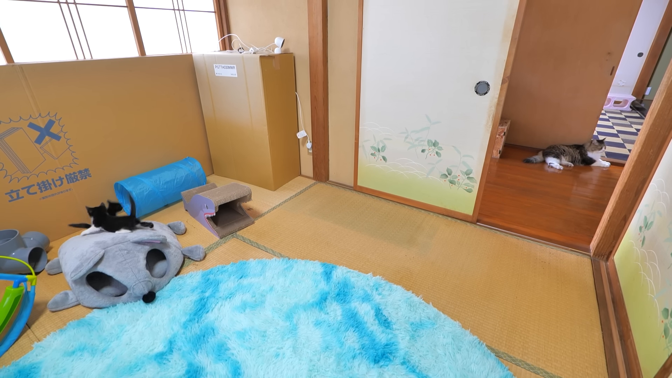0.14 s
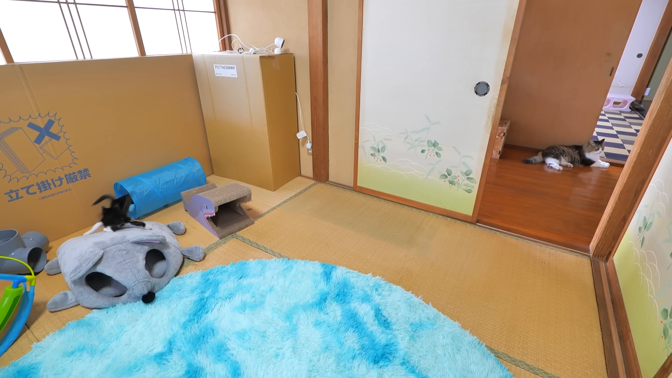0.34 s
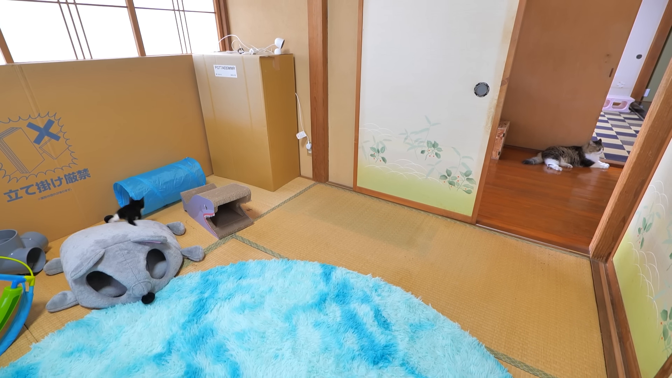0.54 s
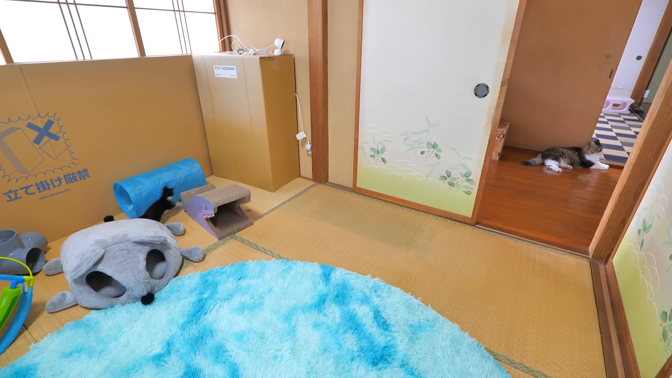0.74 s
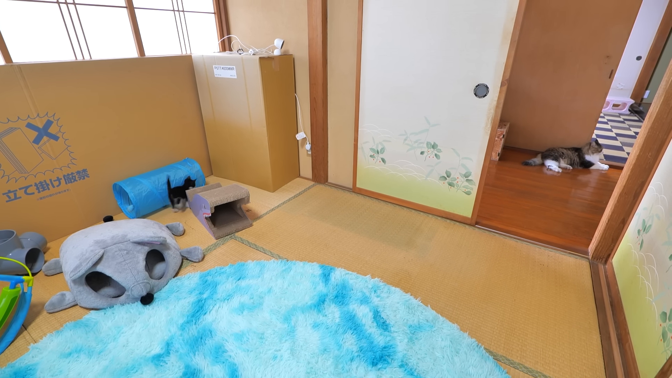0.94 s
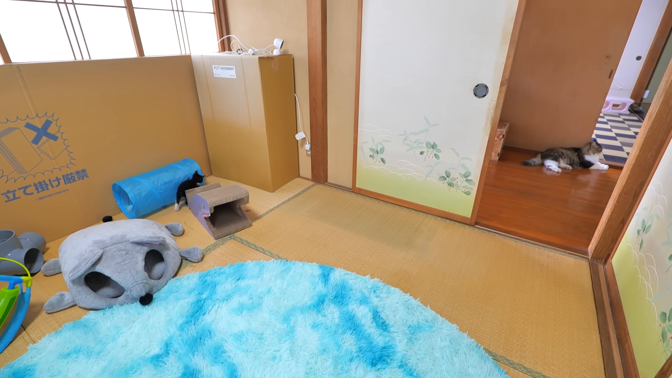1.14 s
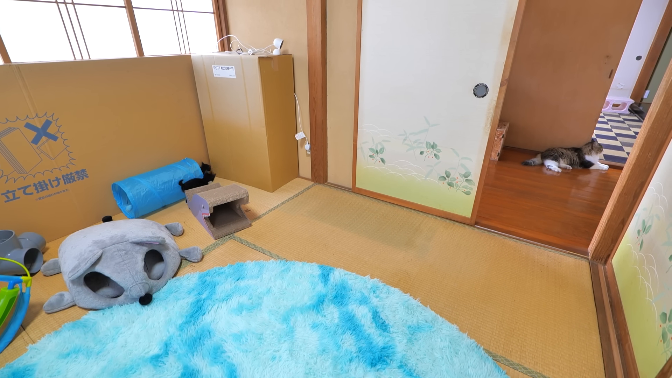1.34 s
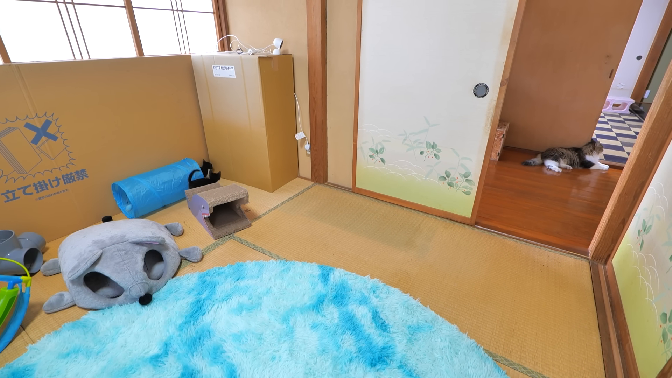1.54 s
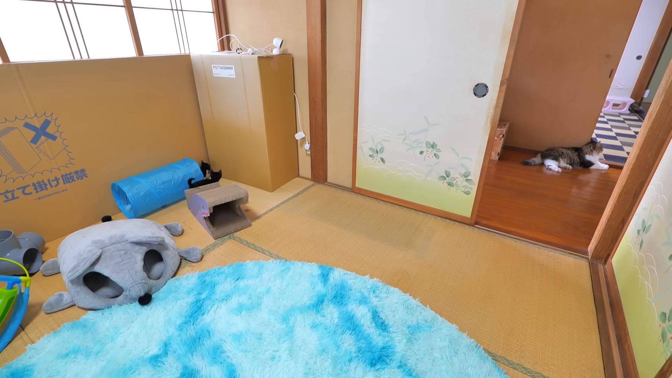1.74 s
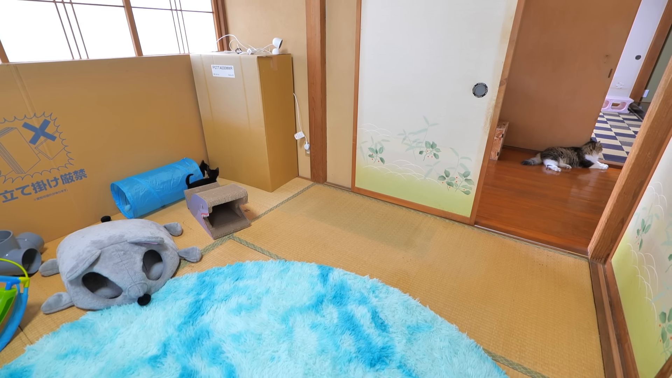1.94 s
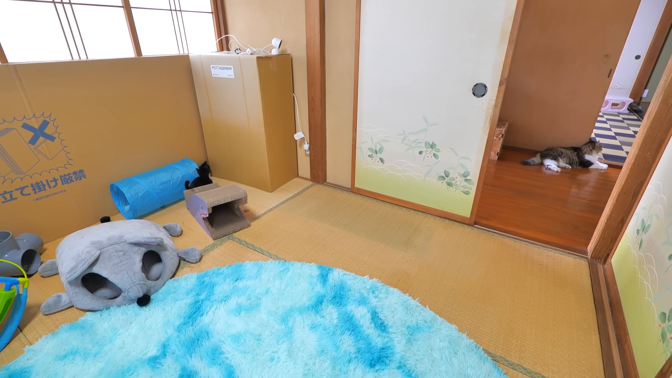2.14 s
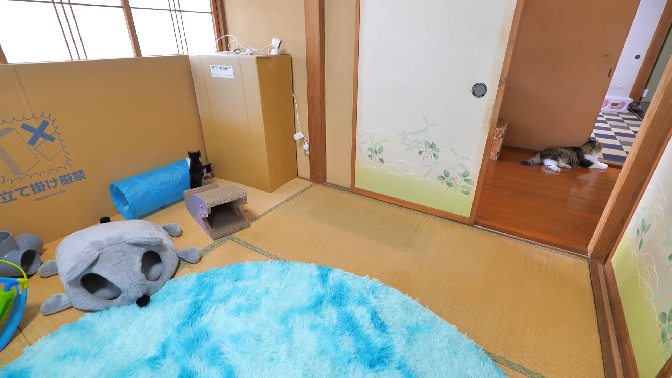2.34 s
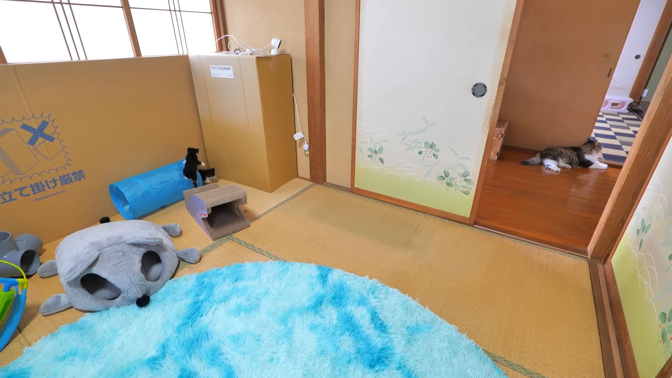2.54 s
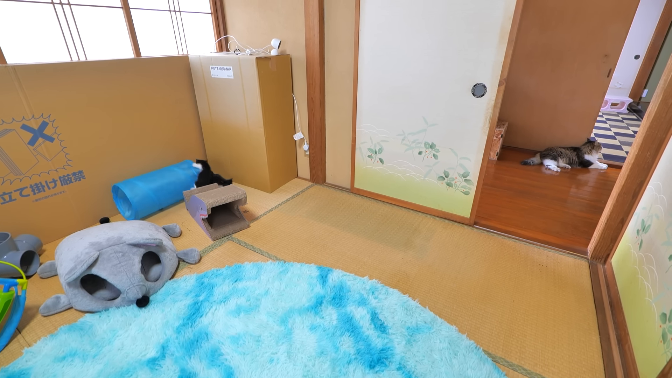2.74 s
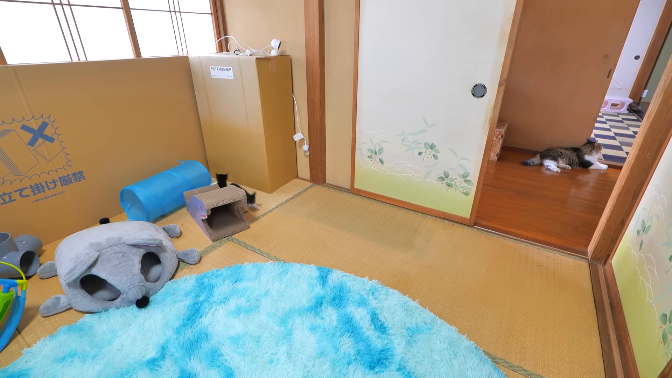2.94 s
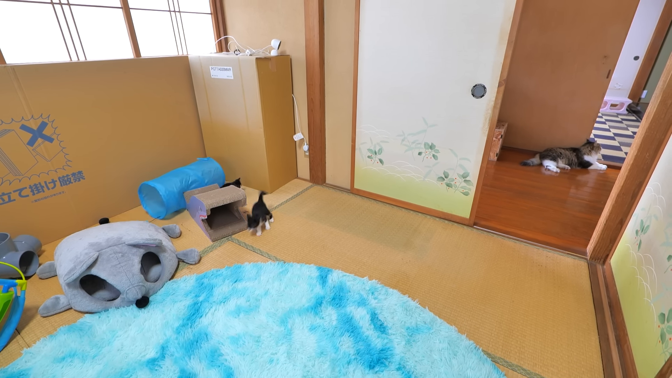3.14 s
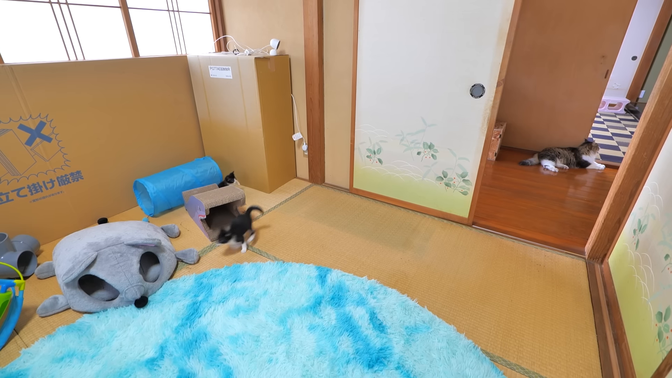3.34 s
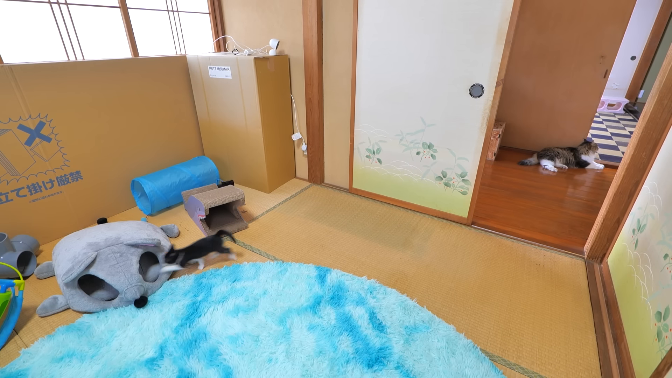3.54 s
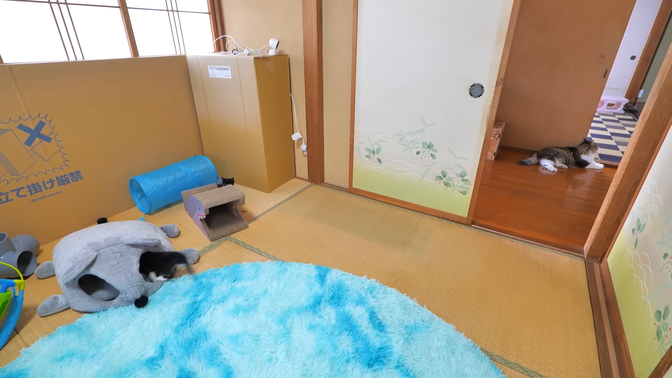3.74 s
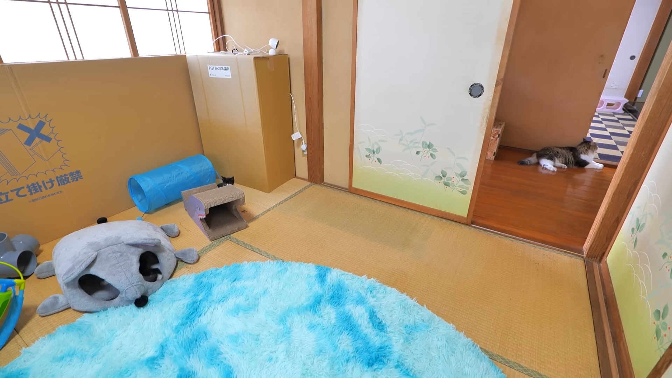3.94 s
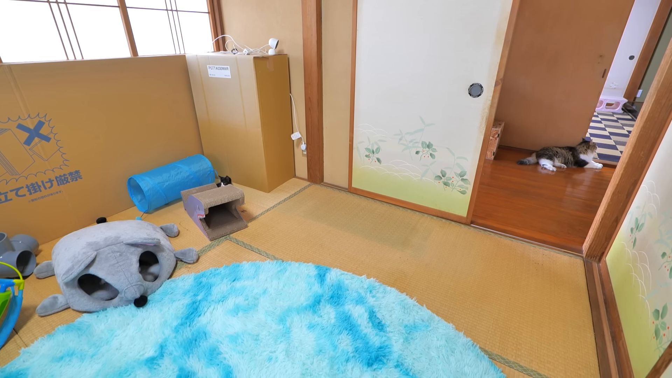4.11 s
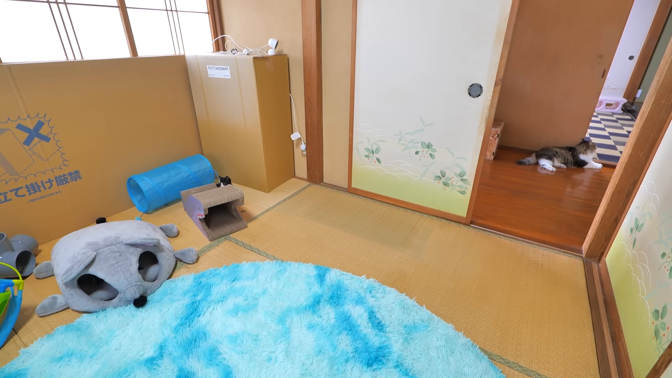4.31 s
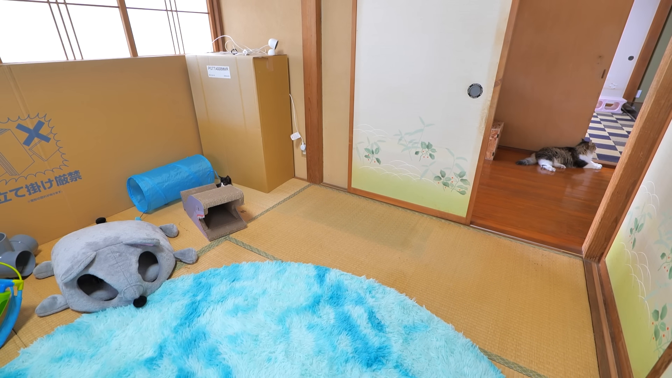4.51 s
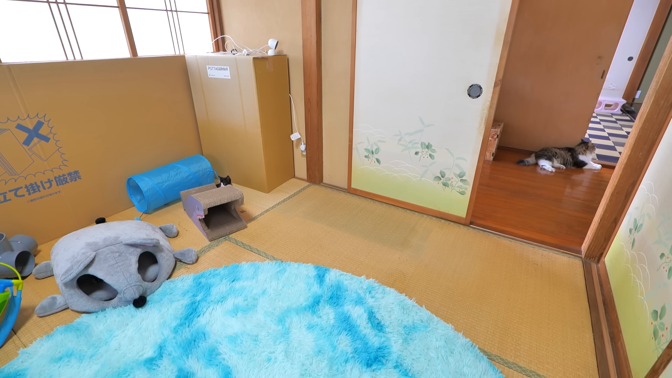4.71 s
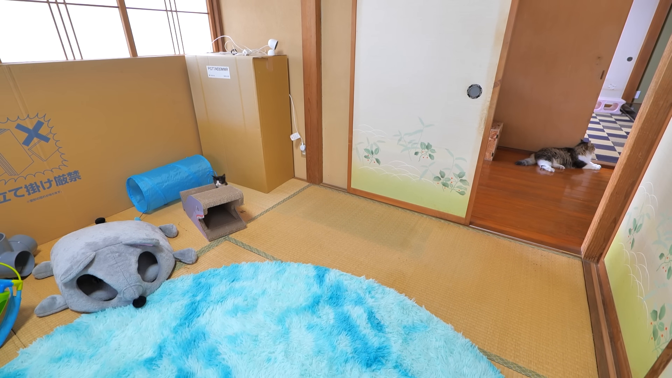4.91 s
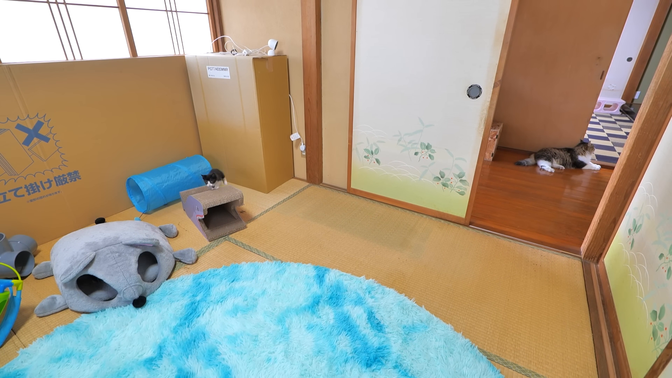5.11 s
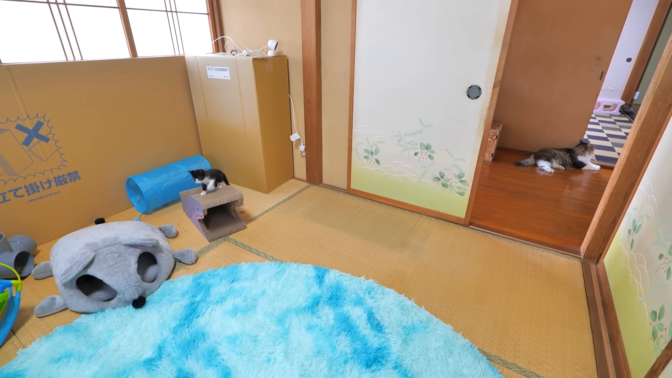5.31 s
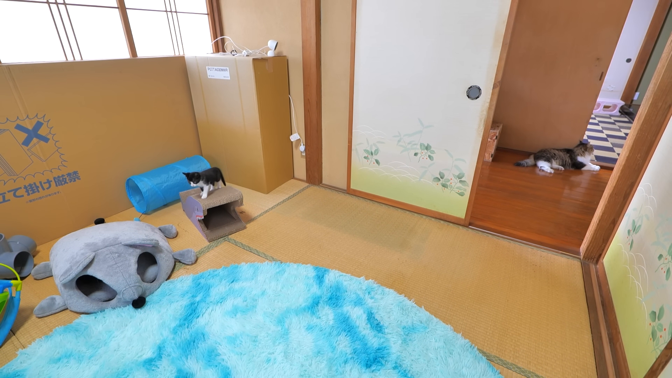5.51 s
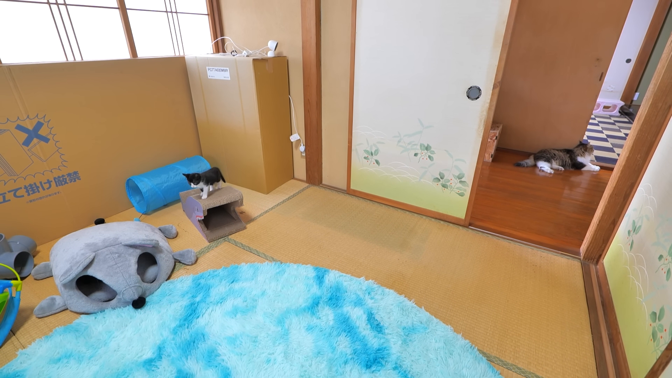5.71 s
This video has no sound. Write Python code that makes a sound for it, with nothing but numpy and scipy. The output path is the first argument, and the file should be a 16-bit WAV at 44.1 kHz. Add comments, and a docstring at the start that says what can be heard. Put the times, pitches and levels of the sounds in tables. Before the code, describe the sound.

Kittens romp a few metres from a mono camera microphone in a small room. Thumps and claw ticks build to a heavy tumble just before one second, ease to scattered taps, then return as a dense scramble with crinkling film around two and a half to three and a half seconds. After four seconds only faint hum, hiss and a few tiny taps remain.

```python
"""Kittens romping indoors

Kittens play over a plush bed, a crinkly tunnel and a cardboard box on a straw-mat floor, a few metres from
a mono camera microphone. Blows mix a short knock, box modes rung by noise, a slower floor thud and a scuff.
Claw ticks are short noise bursts; cloth and film rustle as grainy noise. A small room answers with decaying noise.
Under it lie a wavering hum, murmur and hiss of shaped noise, and one faint throbbing trill from outdoors."""
import sys
import numpy as np
from scipy import signal
from scipy.fft import rfft, irfft
from scipy.io import wavfile
from scipy.ndimage import uniform_filter1d

SR = 44100
rng = np.random.default_rng(int(sys.argv[2]) if len(sys.argv) > 2 else 0)


def waveform_to_disk(signal):
    """Save audio, clipped to [-1, 1], as 16-bit WAV at the path in sys.argv[1]."""
    frames = np.transpose(np.atleast_2d(signal))
    scaled = np.clip(frames, -1, 1) * 32767
    samples = np.round(scaled).astype(np.int16)
    wavfile.write(sys.argv[1], SR, samples)


N = 254016  # samples


def undb(db):
    """Turn dB into an amplitude gain."""
    return 10 ** (np.asarray(db) / 20)


def level(x, db):
    """Scale to an rms level in dB."""
    return x * undb(db) / np.sqrt(np.mean(x ** 2))


def band(x, hz, width, order=1):
    """Band-pass with hz as the geometric centre and width in Hz, kept below 0.45 of the sample rate."""
    low = np.sqrt(hz ** 2 + width ** 2 / 4) - width / 2
    high = min(low + width, .45 * SR)
    return signal.sosfilt(signal.butter(order, [low, high], "band", fs=SR, output="sos"), x)


def walk(rate):
    """Random levels held for 1 / rate seconds, then smoothed twice over that time."""
    hold = int(SR / rate)
    steps = np.repeat(rng.standard_normal(N // hold + 1), hold)
    return uniform_filter1d(uniform_filter1d(steps, hold), hold)[:N]


def add(out, s, x):
    """Mix x into out from time s."""
    start = int(s * SR)
    out[start:start + len(x)] += x[:N - start]


def grains(noise, chance, per_s, spread_db):
    """Noise whose level jumps in small random grains, per_s of them a second."""
    size = int(SR / per_s)
    steps_db = spread_db * np.repeat(chance, size)[:len(noise)]
    return noise * uniform_filter1d(undb(steps_db), size // 2 + 1)


def attack(t, rise_s):
    """Exponential approach to full level."""
    return 1 - np.exp(-t / rise_s)


# colour of the room murmur and microphone hiss: f/Hz, relative level/dB
MURMUR = [(15, -57), (25, -3.5), (102, -4.5), (161, -8), (249, -7.5), (363, -12.5), (416, -24),
          (476, -15.5), (641, -17), (1790, -21), (3720, -34.5), (14800, -31.5), (16000, -34)]
# narrow murmur band: f/Hz, width/Hz, level/dB rms
MURMUR_BAND = [(424, 20, -71)]
MURMUR_DB = -63  # rms before the swell


def background():
    """Room murmur and microphone hiss: noise shaped in frequency, gently swelling, plus a steady narrow band."""
    f = np.maximum(np.fft.rfftfreq(N, 1 / SR), 1)
    hz, db = np.transpose(MURMUR)
    colour = undb(np.interp(np.log(f), np.log(hz), db))
    murmur = irfft(rfft(rng.standard_normal(N)) * colour, N)
    swell = undb(0.7 * walk(1.5))
    narrow = sum(level(band(rng.standard_normal(N), hz, width, order=2), db) for hz, width, db in MURMUR_BAND)
    return level(murmur, MURMUR_DB) * swell + narrow


MOTOR_HZ, MOTOR_DB = 100, -65.5  # centre pitch, rms level


def motor():
    """An appliance humming through the floor: a low sine that wavers in pitch and level."""
    pitch = MOTOR_HZ + 9 * walk(30)
    tone = np.sin(2 * np.pi * np.cumsum(pitch) / SR)
    return level(tone * undb(5.8 * walk(18)), MOTOR_DB)


# rubbing, one table per bout of play: t/s, dragging bodies level/dB, creasing film level/dB
RUSTLE = [
    [(0, -52, -75), (.32, -68.5, -71.5), (.5, -59.5, -96), (.63, -52, -71), (.75, -50.5, -58),
     (.81, -59, -75), (.872, -46.5, -79), (.9, -37.5, -43), (.97, -38, -63), (1.02, -55, -62),
     (1.08, -49, -60), (1.18, -51.5, -67), (1.31, -58.5, -64.5), (1.45, -66, -88)],
    [(1.5, -66, -76), (1.55, -50, -56), (1.62, -65, -81), (1.78, -66, -78), (1.85, -51, -62.5),
     (1.99, -91, -81), (2.3, -80, -74), (2.36, -70, -62.5), (2.48, -65, -96)],
    [(2.49, -65, -72), (2.56, -40, -55), (2.68, -41.5, -58), (2.745, -47, -59.5), (2.82, -44.5, -48.5),
     (2.89, -43.5, -65), (3.03, -46.5, -56.5), (3.1, -37.5, -50), (3.21, -38, -45.5), (3.28, -48.5, -65),
     (3.33, -46.5, -49.5), (3.4, -55, -71), (3.69, -64, -71), (3.91, -68, -75.5), (3.96, -58.5, -74),
     (4.11, -65.5, -79), (4.25, -83, -82)],
    [(4.9, -80, -83), (5.276, -68, -81), (5.5, -80, -94)],
]
CLOTH_DB, CLOTH_SHARE = -1, 0.82  # cloth lies between the two, nearer the film


def rustle():
    """Grainy friction: dull where bodies drag, broad for cloth, crisp where film creases."""
    out, t = np.zeros(N), np.arange(N) / SR
    size = np.abs(rng.standard_normal(N))
    # paws grip and let go some tens of times a second
    grip = undb(2.7 * walk(40))
    dense = grains(rng.standard_normal(N), size, per_s=500, spread_db=5) * grip
    coarse = grains(rng.standard_normal(N), size, per_s=90, spread_db=2.9)
    drag = level(band(coarse, 255, 550), 0)
    cloth = level(band(dense, 1850, 5600, order=2), 0)
    film = level(band(dense, 7350, 13000), 0)
    for bout in RUSTLE:
        s, *columns = np.transpose(bout)
        drag_db, film_db = (np.interp(t, s, c, left=-140, right=-140) for c in columns)
        cloth_db = CLOTH_DB + drag_db + CLOTH_SHARE * (film_db - drag_db)
        out += undb(cloth_db) * cloth + undb(drag_db) * drag + undb(film_db) * film
    return out


# claw ticks and film snaps: t/s, peak level/dB, centre f/Hz, crisp top level/dB (rms of its first 10 ms)
TICKS = [(0.058, -63, 6000, -61.5), (0.0865, -42.5, 4000, -62), (0.2344, -39, 2870, -80),
         (0.436, -41, 2670, -47), (0.497, -36, 3080, -49.5), (0.5808, -54, 8640, -55),
         (0.595, -39, 6740, -65), (0.6475, -36.5, 2810, -52.5), (0.6686, -49, 5700, -67),
         (0.708, -36, 3330, -54), (0.722, -34, 3530, -62), (0.745, -27.5, 4330, -55.5),
         (0.831, -35.5, 3580, -78), (0.854, -46, 4870, -57), (0.9175, -26.5, 3150, -53),
         (0.95, -30, 2800, -62), (1.096, -50, 3380, -58), (1.143, -59, 5600, -53.5),
         (1.1597, -39.5, 2570, -51), (1.238, -59, 3500, -67), (1.337, -51, 3330, -56.5),
         (1.469, -54, 4210, -72), (1.5177, -34, 2860, -44), (1.5614, -29, 2940, -58),
         (1.661, -49, 2650, -61), (1.7897, -46, 2660, -63), (1.805, -37.5, 2830, -51.5),
         (1.828, -33, 2700, -86), (1.927, -42, 3370, -62), (2.346, -58, 4000, -61),
         (2.3722, -33.5, 2900, -60), (2.5046, -31, 2900, -43.5), (2.5315, -30.5, 3320, -47.5),
         (2.572, -30, 4460, -62), (2.5864, -38, 3630, -53), (2.614, -32, 4400, -48.5),
         (2.676, -31.5, 2500, -53), (2.654, -36, 4960, -48.5), (2.707, -32.5, 3340, -49),
         (2.774, -32.5, 2800, -57), (2.7965, -35, 3550, -55), (2.917, -31.5, 3500, -66),
         (3.002, -51, 3900, -58), (3.074, -37, 4230, -56), (3.092, -32, 6500, -53),
         (3.1093, -24.5, 2840, -52), (3.226, -27.5, 2900, -48), (3.324, -33.5, 5100, -58),
         (3.336, -40, 4970, -65), (3.447, -40, 3200, -69), (3.486, -56, 2930, -56), (3.52, -43, 2540, -64),
         (3.581, -55, 6500, -72), (3.606, -48, 5900, -72), (3.684, -41.5, 2960, -88),
         (3.739, -45.5, 3470, -81), (4.002, -54, 3050, -64), (4.018, -53, 4350, -54.5),
         (4.086, -51.5, 2740, -68), (5.048, -59, 4000, -77), (5.0883, -52, 2620, -68),
         (5.203, -68, 5030, -74), (5.25, -55, 2450, -68), (5.37, -64, 6060, -70)]
TICK_RISE_S, TICK_FADE_S = 0.00074, 0.009


def ticks():
    """Claws and film: short grainy noise bursts, one band for the claw and a higher, wider one for the film."""
    out, t = np.zeros(N), np.arange(int(.08 * SR)) / SR
    noise = rng.standard_normal((len(TICKS), 2, len(t)))
    for (s, db, hz, crisp_db), (hiss, chance) in zip(TICKS, noise):
        spatter = grains(hiss, np.abs(chance), per_s=1200, spread_db=8.0)
        burst = spatter * np.exp(-t / TICK_FADE_S) * attack(t, TICK_RISE_S)
        claw = band(burst, hz, hz, order=2)
        film = band(burst, 6200, 6500)
        claw = undb(db) * claw / np.abs(claw).max()
        film = undb(crisp_db) * film / film[:SR // 100].std()
        add(out, s - .0005, claw + film)
    return out


def knock(t, hz):
    """The first contact: a few cycles of a sine under a short hump."""
    u = t * hz / 1.35
    return -u * np.exp((1 - u ** 2) / 2) * np.sin(2 * np.pi * hz * t)


# the box and the boards under the mats ring briefly: f/Hz, relative level/dB, 60 dB decay t/s
BOX = [(249, 8.5, 0.06), (337.6, -9.5, 0.14), (441.5, 16, 0.012), (509, 10.5, 0.014), (657, 9, 0.011),
       (810, 6.5, 0.013), (907, 1, 0.018), (1038, 0, 0.012), (1325, -12.5, 0.059), (1738, -32, 0.048),
       (1920, -26, 0.03), (2500, -39, 0.12)]


def box_ring(t, hz, bumps):
    """The rest of the body follows as smaller bumps that excite damped modes."""
    push = band(bumps, 2.33 * hz, 1670)
    ring = 0
    for f, db, t60 in BOX:
        mode = np.sin(2 * np.pi * f * t) * 1000. ** (-t / t60)
        ring = ring + undb(db) * signal.fftconvolve(push, mode)[:len(t)]
    return ring / np.abs(ring).max()


# boards that thud: f/Hz, level near the bed/dB, level near the box/dB
FLOOR = [(107.8, -8.0, -4.5), (171, -3, -7.5)]
BOX_S = (1.5, 3.7)  # while the play is at the box
THUD_RISE_S, SPOT_SPREAD = 0.0083, 0.064


def floor_thud(t, s, chance):
    """Heavy boards take several milliseconds to get moving, then die away."""
    v = t / THUD_RISE_S
    spot = 1 + SPOT_SPREAD * np.tanh(chance)  # each blow finds a spot with its own pitch
    at_box = BOX_S[0] < s < BOX_S[1]
    modes = sum(undb(box_db if at_box else bed_db) * np.sin(2 * np.pi * f * spot * t)
                for f, bed_db, box_db in FLOOR)
    return v * np.exp(1 - v) * modes


# widths are shares of the centre frequency
SCUFF_HZ, SCUFF_WIDTH, SCUFF_RISE_S = 1850, 1, 0.0029
TUNNEL_HZ, TUNNEL_WIDTH, TUNNEL_S = 2990, .55, (1.3, 2.55)  # brighter while the play is at the tunnel


def scuff(t, s, grit, fade):
    """Paws scuffing: a band of grainy noise that rises fast and fades with the tumble."""
    at_tunnel = TUNNEL_S[0] < s < TUNNEL_S[1]
    hz, width = (TUNNEL_HZ, TUNNEL_WIDTH) if at_tunnel else (SCUFF_HZ, SCUFF_WIDTH)
    rub = band(grit, hz, width * hz, order=3) * fade * attack(t, SCUFF_RISE_S)
    return rub / np.abs(rub).max()


# paw and body blows: t/s, knock level/dB, knock f/Hz, tumble peak level/dB, floor thud level/dB,
# scuff peak level/dB, tumble decay t/s
BLOWS = [(0.072, -25, 850, -24.5, -42, -56, 0.033), (0.095, -50, 430, -22.5, -30, -35.5, 0.0097),
         (0.217, -57, 300, -42.5, -47, -51, 0.012), (0.233, -37, 490, -23, -31, -39.5, 0.028),
         (0.437, -40, 328, -33.5, -68, -48, 0.014), (0.499, -35.5, 292, -36.5, -44, -47, 0.0099),
         (0.641, -41, 312, -34, -67, -45, 0.015), (0.71, -39, 463, -30, -39.5, -41, 0.011),
         (0.743, -26.5, 1010, -29, -65, -26, 0.026), (0.855, -57, 396, -34, -59, -44, 0.016),
         (0.879, -20, 290, -16, -60, -41, 0.015), (0.891, -29, 516, -25.5, -53, -27, 0.024),
         (0.909, -42, 530, -19, -49, -25.5, 0.048), (0.973, -21.5, 860, -28.5, -60, -33.5, 0.026),
         (1.471, -40, 405, -40, -42, -74, 0.039), (1.52, -48, 790, -26.5, -35, -25.5, 0.02),
         (1.74, -45, 487, -50, -48, -77, 0.02), (1.809, -41.5, 594, -35, -60, -39, 0.044),
         (1.908, -42.5, 520, -39.5, -62, -45, 0.012), (2.163, -51.5, 327, -48, -49.5, -72, 0.021),
         (2.367, -51.5, 500, -56, -65, -47, 0.0099), (2.507, -50, 583, -30.5, -48, -40.5, 0.03),
         (2.569, -25, 309, -24, -56, -35, 0.0095), (2.584, -27, 277, -34.5, -62, -36, 0.037),
         (2.655, -29, 360, -28.5, -50, -39, 0.0095), (2.812, -42, 480, -31.5, -43, -38, 0.037),
         (2.896, -28.5, 510, -27.5, -25.5, -45, 0.021), (2.915, -23.5, 544, -22, -24, -27.5, 0.0073),
         (2.929, -24.5, 500, -25, -54, -31, 0.0058), (3.134, -18.5, 554, -22.5, -41, -38, 0.0046),
         (3.143, -37, 402, -24.5, -28.5, -35, 0.013), (3.203, -27, 620, -24.5, -62, -27.5, 0.0071),
         (3.216, -27, 470, -27, -57, -53, 0.015), (3.33, -35, 840, -38, -67, -45, 0.038),
         (3.45, -36.5, 790, -35, -66, -53, 0.019), (3.494, -51, 490, -30.5, -42, -54, 0.0069),
         (3.509, -24, 777, -25.5, -45, -58, 0.025), (3.556, -41, 400, -44, -41, -47, 0.0088),
         (3.683, -61, 595, -31.5, -40, -54, 0.016), (3.746, -49, 644, -50, -61, -46, 0.027),
         (3.927, -23, 297, -30.5, -65, -68, 0.0044), (3.94, -42, 291, -46, -61, -77, .03),
         (5.102, -45, 436, -48.5, -71, -57, 0.027), (5.118, -44, 404, -63, -58, -68, 0.013),
         (5.267, -44, 605, -63, -60, -56, 0.022), (5.271, -40, 247, -43.5, -47.5, -65, 0.02),
         (5.372, -47, 295, -45.5, -67, -60, 0.027)]


def blows():
    """Each blow: a knock, the tumbling body ringing the box, a slower floor thud and a scuff."""
    out, t = np.zeros(N), np.arange(int(.25 * SR)) / SR
    noise = rng.standard_normal((len(BLOWS), 3, len(t)))
    for (s, db, hz, tumble_db, thud_db, scuff_db, long_s), (body, rub, chance) in zip(BLOWS, noise):
        fade = np.exp(-t / max(long_s, .002)) * attack(t, 0.0017)
        bumps = grains(body, np.abs(chance), per_s=300, spread_db=4.5) * fade
        grit = grains(rub, np.abs(chance[::-1]), per_s=500, spread_db=4)
        blow = undb(db) * knock(t, hz)
        blow += undb(tumble_db) * box_ring(t, hz, bumps)
        blow += undb(thud_db) * floor_thud(t, s, chance[0])
        blow += undb(scuff_db) * scuff(t, s, grit, fade)
        add(out, s - .001, blow)
    return out


# echo tail of the small room: f/Hz, 60 dB decay t/s, relative level/dB
ROOM_T60 = [(103, 0.33, 2), (306, 0.48, -5), (960, 0.12, 1.5), (3000, 0.3, -2), (5950, 0.15, 0.5),
            (12900, 0.14, -1)]
ROOM_DB, WALL_S = -12.5, 0.0095  # echo energy against direct sound, rise time of the nearest wall's echo


def room(x):
    """Octave bands of decaying noise as the echo tail, starting with the nearest wall."""
    t, tail = np.arange(int(.5 * SR)) / SR, 0
    hz_pts, t60, db = np.transpose(ROOM_T60)
    for hz in 90 * 2. ** np.arange(8):
        long_s, share_db = (np.interp(np.log(hz), np.log(hz_pts), c) for c in (t60, db))
        noise = band(rng.standard_normal(len(t)), hz, 0.75 * hz, order=2)
        tail = tail + undb(share_db) * noise * 1000. ** (-t / long_s)
    # silent for 0.4 of WALL_S, then a ramp lasting WALL_S
    tail = tail * np.clip(t / WALL_S - .4, 0, 1)
    tail = tail / np.sqrt(np.sum(tail ** 2))
    return x + undb(ROOM_DB) * signal.fftconvolve(x, tail)[:N]


TRILL_S, TRILL_RISE_S, TRILL_FADE_S = 4.6, 0.056, 0.14  # start, rise, fade
TRILL_HZ, TRILL_DB = 3290, -72  # centre pitch, amplitude before the throb


def trill():
    """A thin high note from outdoors: a wavering sine that swells in, throbs quickly and fades."""
    t = np.arange(N) / SR
    throb = (1 + 0.5 * np.sin(2 * np.pi * 38 * t)) * undb(4 * walk(60))
    tone = np.sin(2 * np.pi * np.cumsum(TRILL_HZ + 45 * walk(56)) / SR)
    rise = (t - TRILL_S) / TRILL_RISE_S
    fade = 1 - (t - TRILL_S - TRILL_RISE_S) / TRILL_FADE_S
    shape = np.clip(np.minimum(rise, fade), 0, 1)
    return undb(TRILL_DB) * shape * throb * tone


def scene():
    """Everything reaches one microphone; only the play excites the room."""
    play = rustle() + ticks() + blows()
    mono = background() + motor() + room(play) + trill()
    return np.array([mono, mono])


TOP_HZ = 15850  # upper edge of the camera's passband


def record(dry):
    """The camera thins the deep bass and cuts the top steeply."""
    thin = signal.sosfilt(signal.butter(3, 75, "high", fs=SR, output="sos"), dry)
    return signal.sosfilt(signal.ellip(10, .2, 70, TOP_HZ, fs=SR, output="sos"), thin)


dry = scene()
out = record(dry)
waveform_to_disk(out)
```